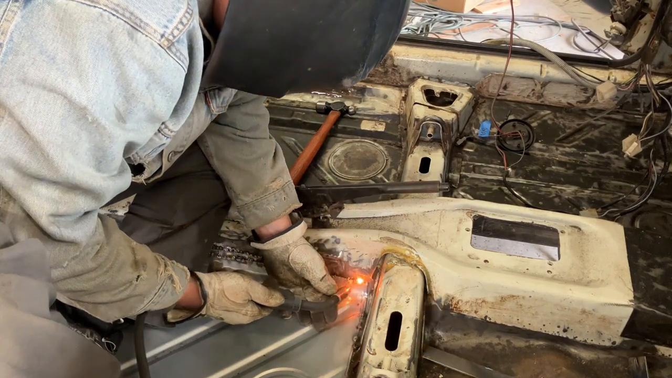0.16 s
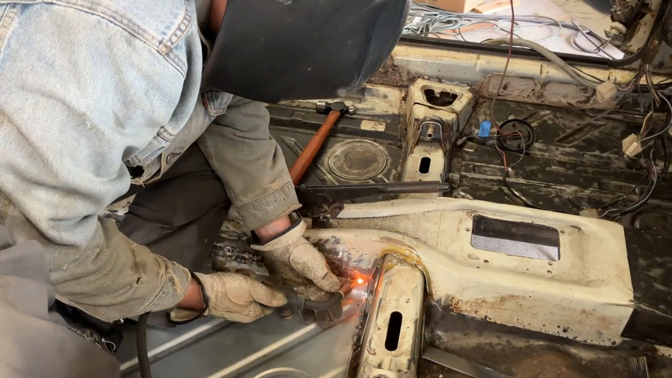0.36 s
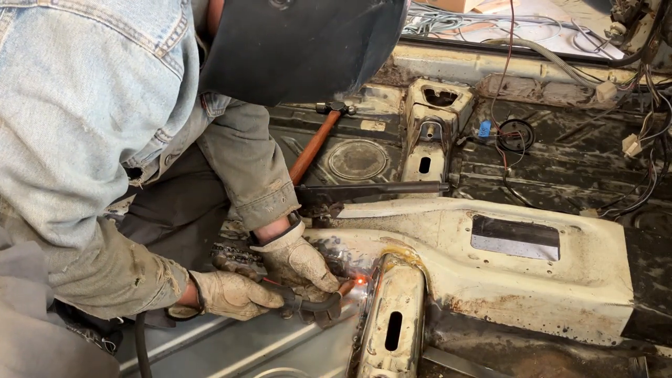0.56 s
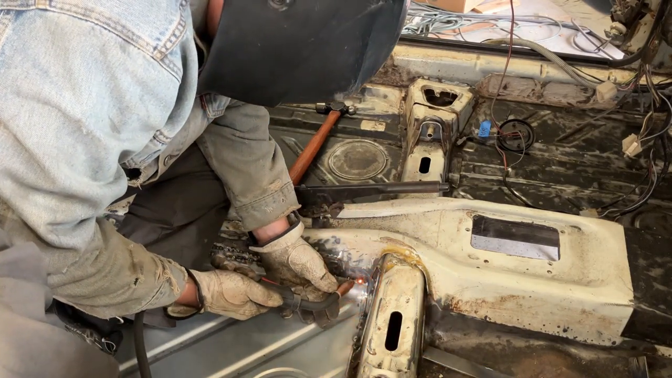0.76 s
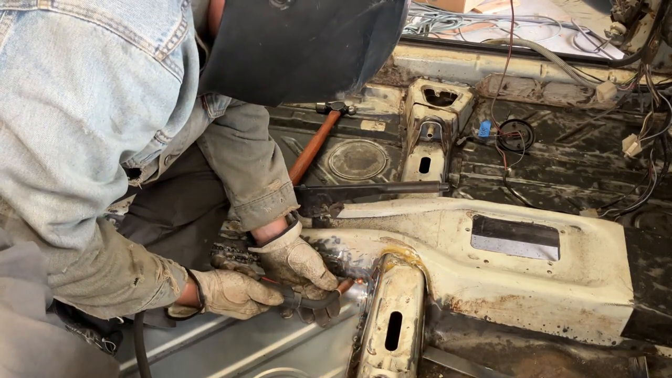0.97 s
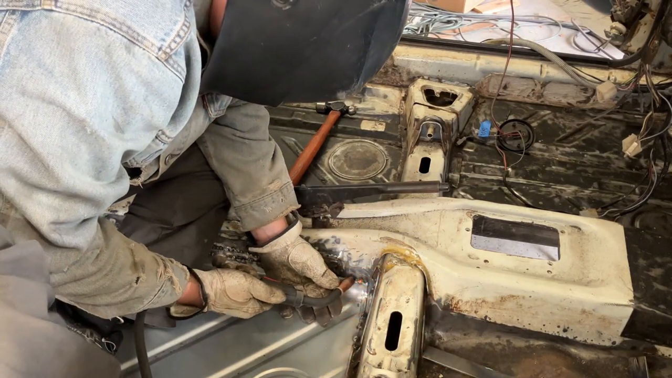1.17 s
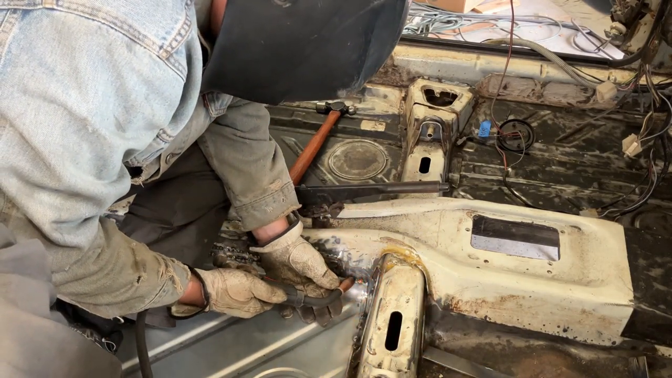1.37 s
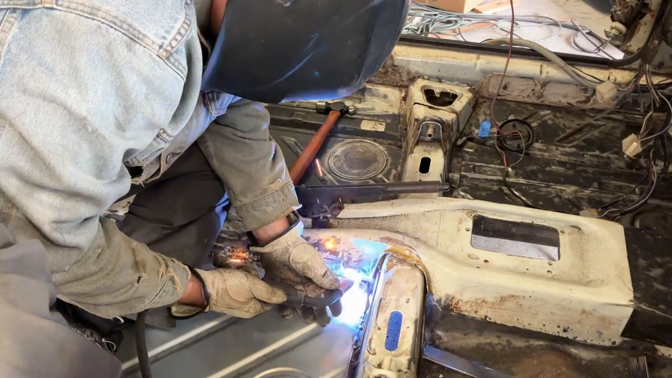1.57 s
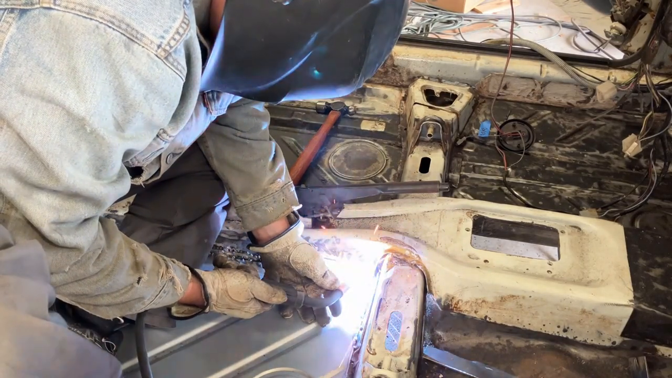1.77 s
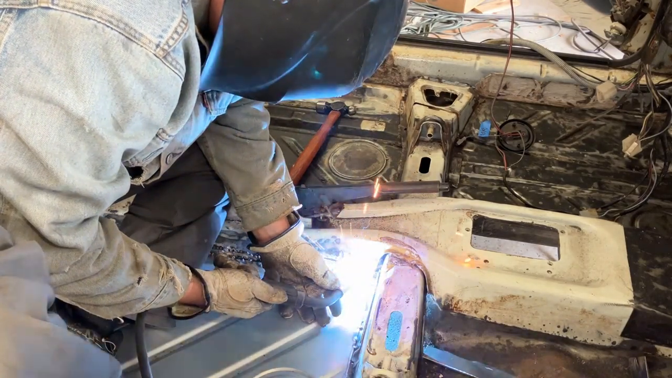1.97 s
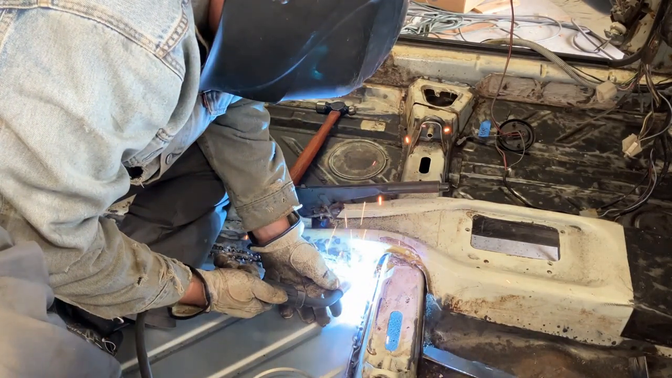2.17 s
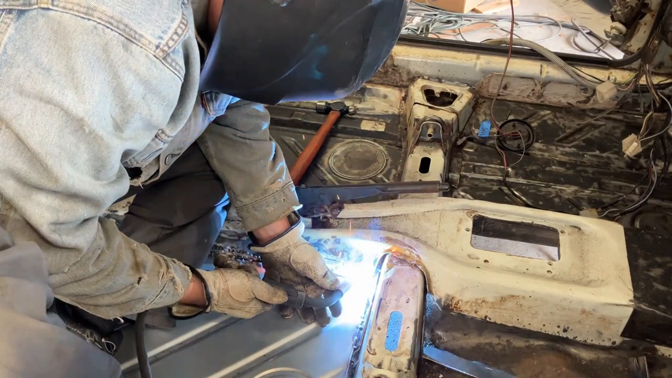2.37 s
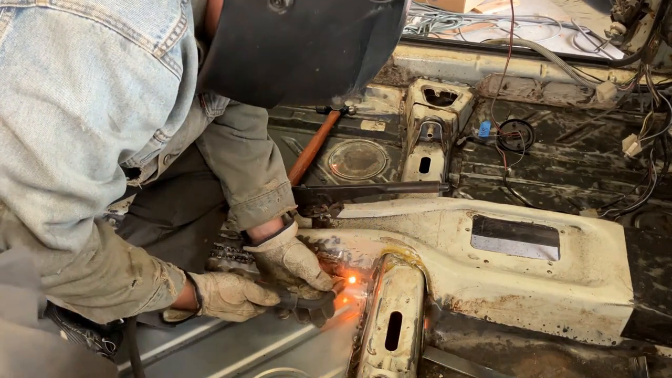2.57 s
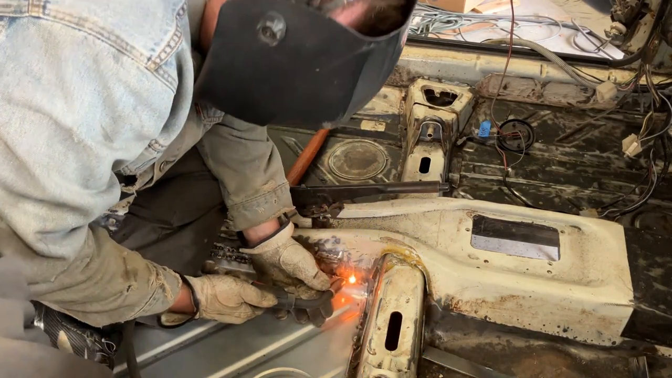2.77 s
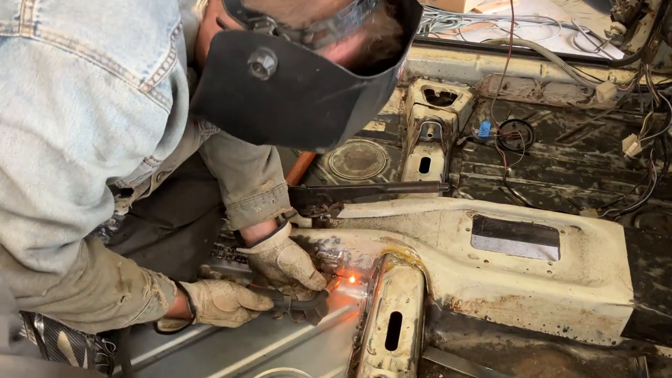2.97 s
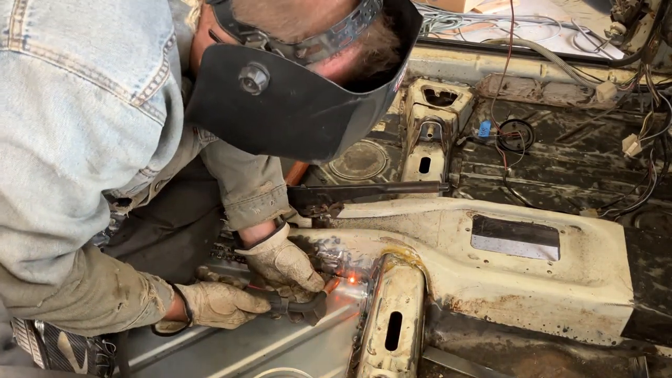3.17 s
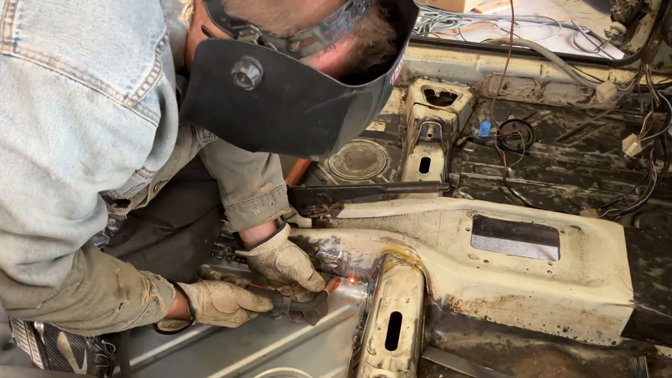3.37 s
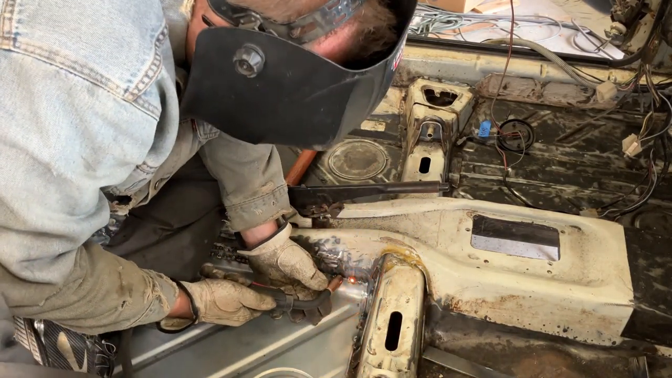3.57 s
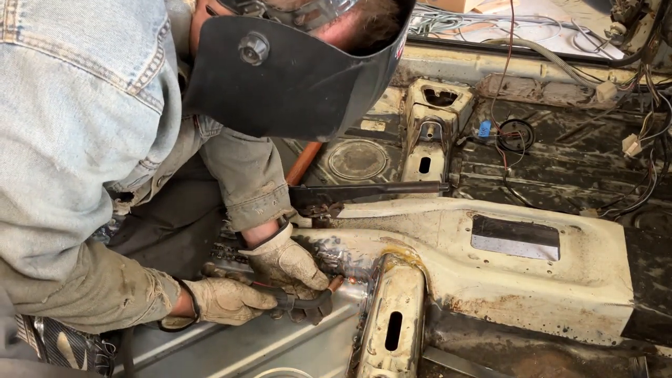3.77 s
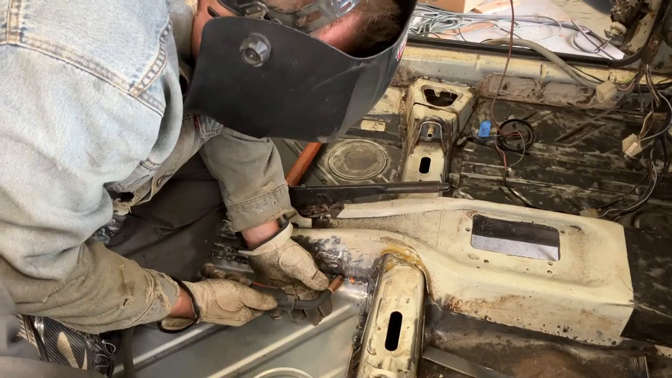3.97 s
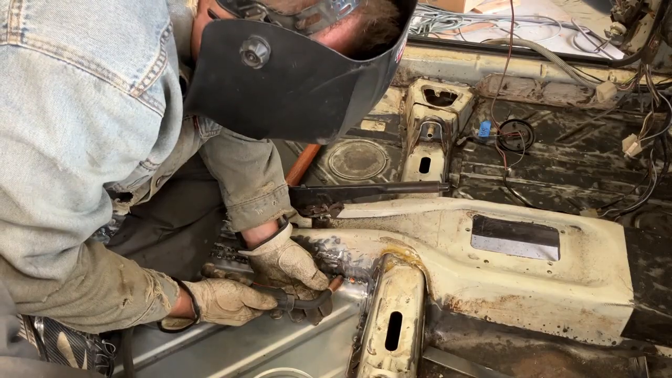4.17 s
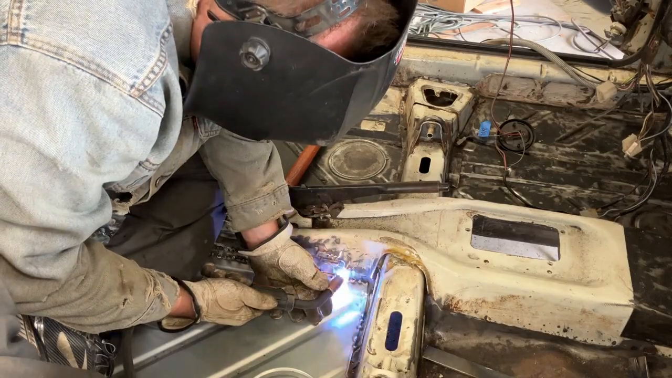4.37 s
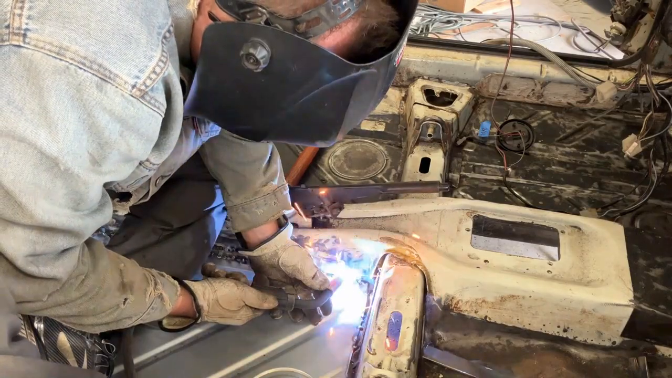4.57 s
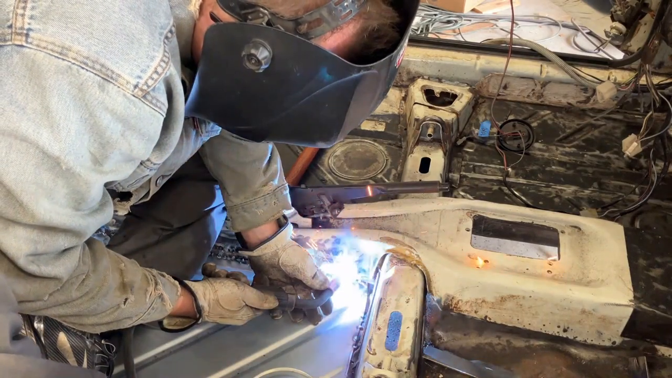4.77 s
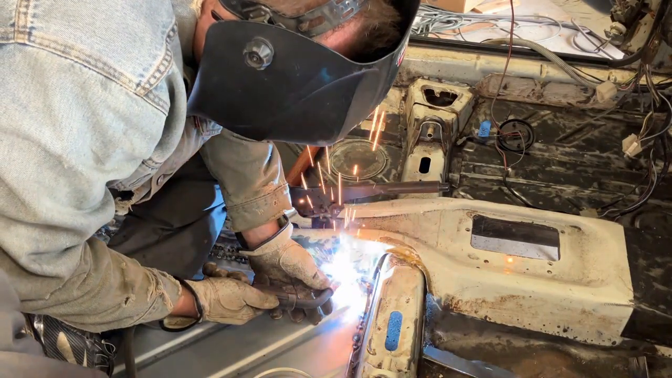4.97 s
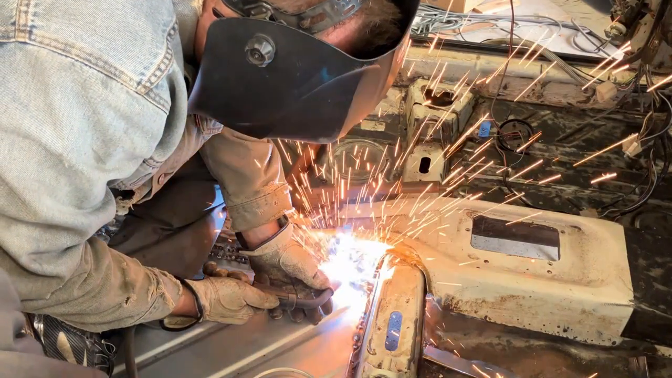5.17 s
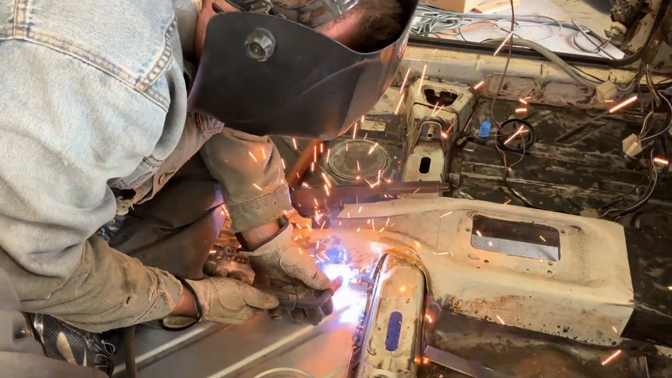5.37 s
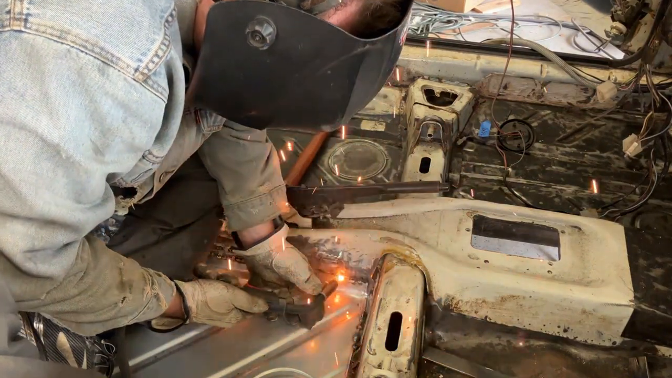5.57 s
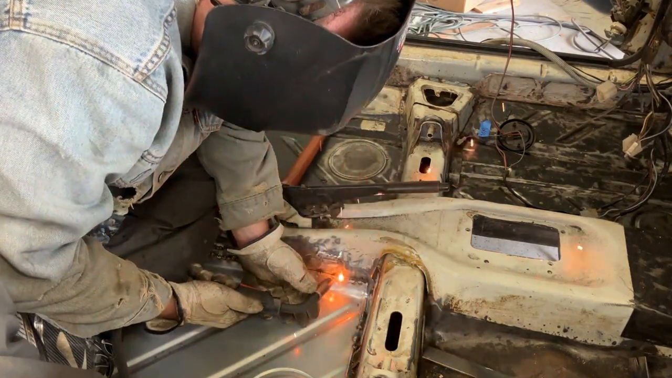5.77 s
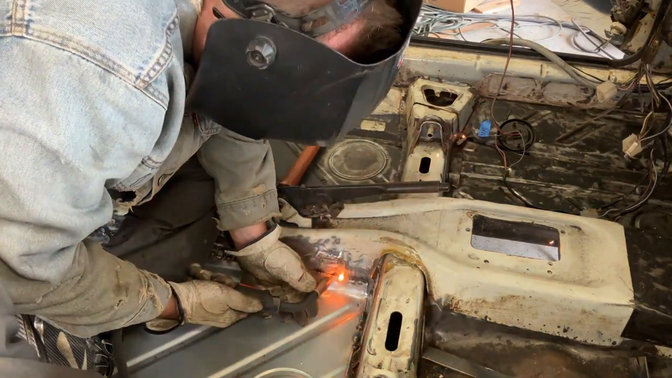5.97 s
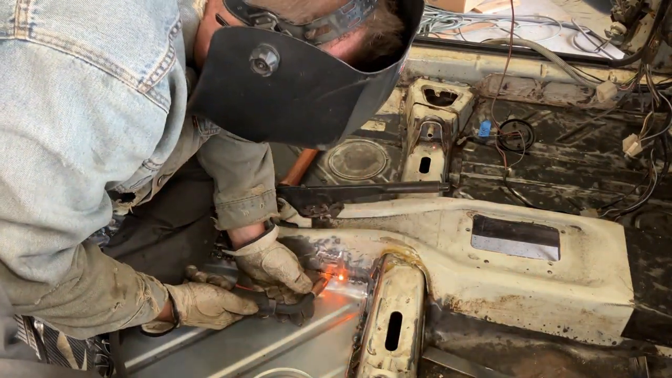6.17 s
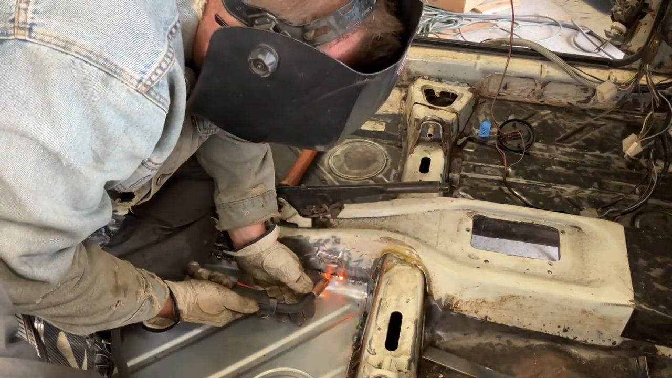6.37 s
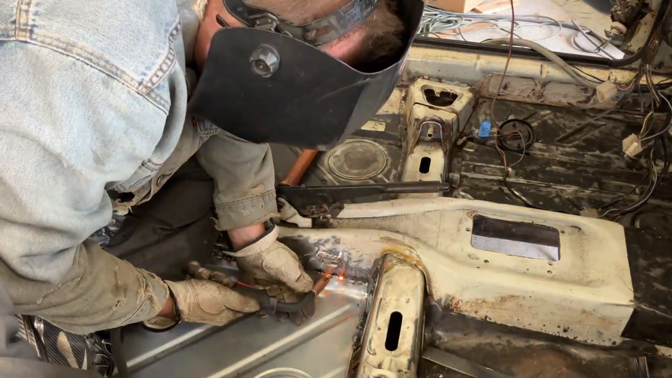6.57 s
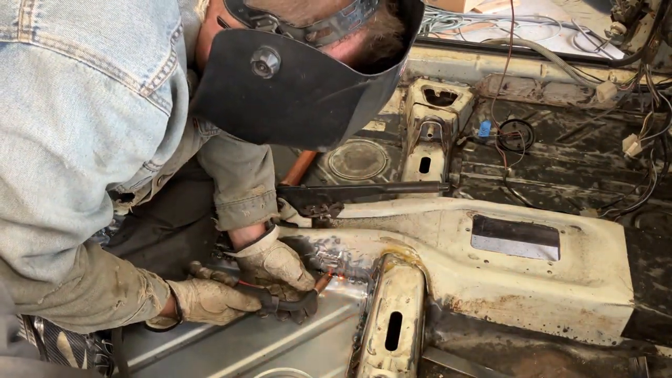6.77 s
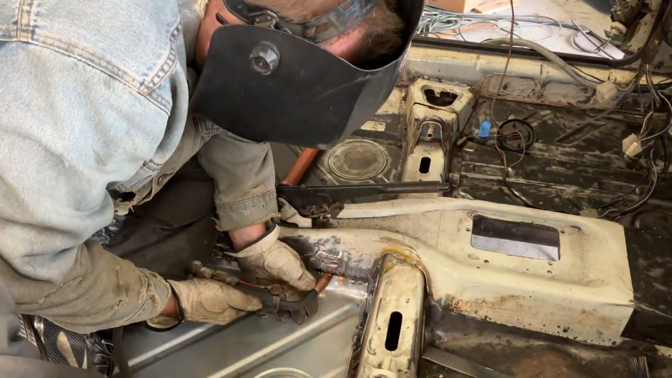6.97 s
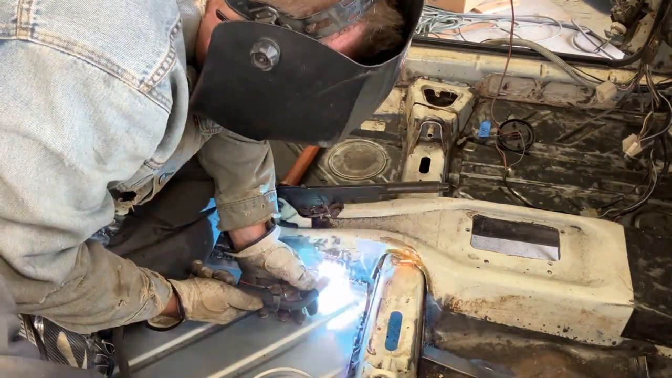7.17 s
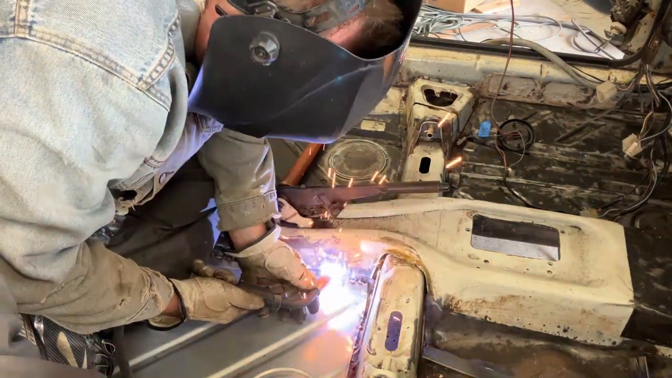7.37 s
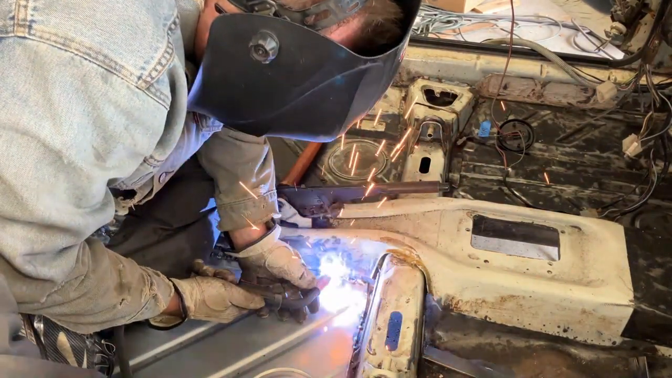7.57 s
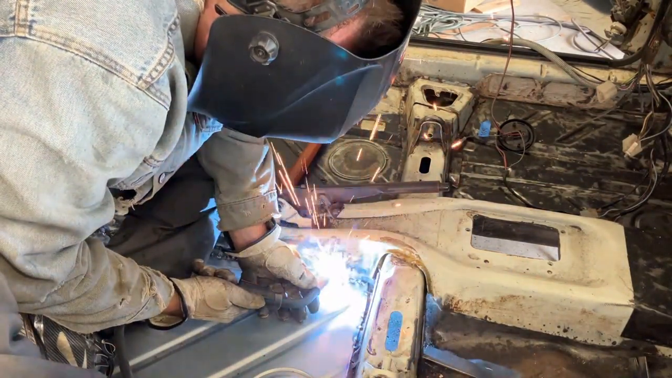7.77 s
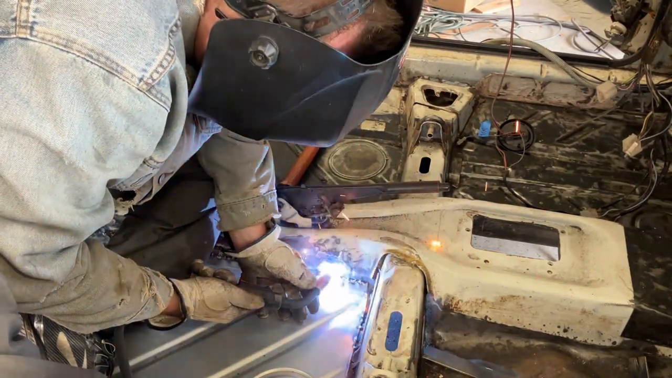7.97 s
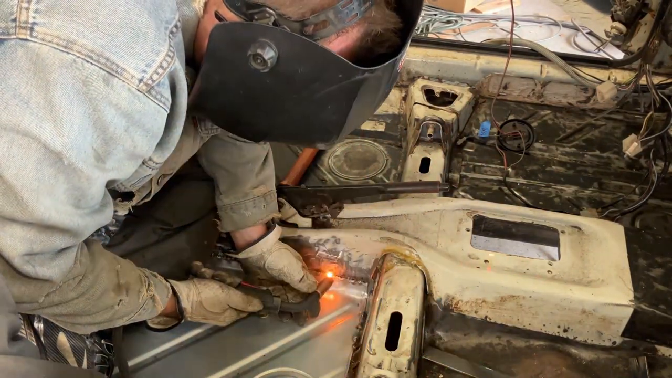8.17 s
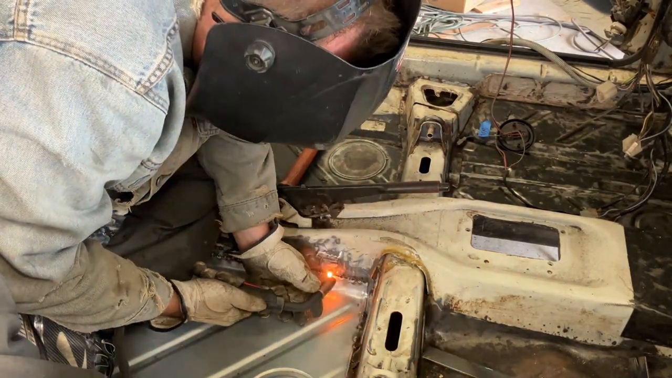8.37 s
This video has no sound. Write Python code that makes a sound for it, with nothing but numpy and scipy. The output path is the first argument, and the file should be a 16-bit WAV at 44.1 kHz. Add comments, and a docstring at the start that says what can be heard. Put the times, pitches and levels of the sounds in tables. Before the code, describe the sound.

Quiet room rumble and fading fizz open, then a welding arc crackles in a stuttering burst. After a pause of tiny metal ticks a second, longer burst spits and snaps, with soft low thumps of air near its end. Another lull follows, then a third, shorter, forceful burst. Close wide stereo, metallic reflections, short garage reverberation.

```python
"""A garage, where a wire-feed welder lays three short tacks on sheet steel. Gas hisses first, then the wire
shorts and the arc re-strikes in sharp pops: noise bursts that ring the resonances of the steel pan. Shaped
noise makes arc sizzle, gas and wire-feed whirr; soft pulses push air, bright clicks tick as steel cools.
Rumble, buffeting and fizz are slowly varied noise, and two faint whines are wavering sines. The recorder delays
the bass and turns phase between its two sides."""
import sys
import numpy as np
from scipy import signal
from scipy.fft import rfft, irfft, next_fast_len
from scipy.io import wavfile
from scipy.ndimage import uniform_filter1d, map_coordinates

SR = 44100
rng = np.random.default_rng(int(sys.argv[2]) if len(sys.argv) > 2 else 0)


def log_audio(samples):
    """Write samples as a 16-bit WAV file to the path given in sys.argv[1]."""
    # one column per channel
    frames = np.atleast_2d(samples).T
    # limit to full scale, then quantise
    limited = np.clip(frames, -1, 1)
    pcm = np.round(limited * 32767).astype(np.int16)
    wavfile.write(sys.argv[1], SR, pcm)


N = 371763

# Three tacks, each elsewhere on the pan: (trigger on [s], trigger off [s], low modes [dB], middle modes [dB],
# high modes [dB], gas [dB], wire-feed whirr [dB])
TACKS = [(1.407, 2.465, 3, 3, 1, -43, -53), (4.131, 5.376, 4.5, 2.5, 2.5, -44, -52.5),
         (7.093, 7.965, 1.5, -4.5, 1.5, -44, -53)]
# Runs of arc re-strikes between stumbles of the wire: (first pop [s], last pop [s], count,
# first pop level [dB], last pop level [dB], arc sizzle [dB], hurry [ratio, gaps shorten above 0])
ARC_RUNS = [(1.5088, 1.5087, 1, -16, -15.5, -41, 0), (1.6003, 1.6005, 1, -15, -16, -28.5, 0),
            (1.6201, 1.7046, 7, -15, -13.5, -33, .04), (1.7399, 1.7768, 3, -14.5, -13, -33, -.2),
            (1.811, 1.8395, 3, -14, -19, -36, .1), (1.8581, 1.9083, 4, -17.5, -15, -37.5, .15),
            (1.9382, 1.9912, 4, -18, -14, -36, .25), (2.0093, 2.1069, 7, -18.5, -16, -40, .04),
            (2.1405, 2.235, 7, -16, -17, -44, -.1), (2.2699, 2.3368, 5, -16.5, -15, -37.5, -.15),
            (2.3503, 2.4064, 4, -19.5, -17.5, -40, .15), (2.4275, 2.4445, 2, -15.5, -15.5, -41.5, 0),
            (4.2874, 4.2875, 1, -16, -16.5, -44.5, 0), (4.381, 4.381, 1, -29, -29, -42, 0),
            (4.395, 4.4379, 4, -14, -17, -29, -.05), (4.4891, 4.5482, 5, -19, -16.5, -34.5, .16),
            (4.5976, 4.687, 6, -16, -16, -35, .3), (4.6963, 4.7156, 3, -16, -17, -29, -.3),
            (4.7352, 4.7795, 5, -17, -19.5, -32, .1), (4.7989, 4.8613, 5, -16, -15.5, -32, .26),
            (4.8815, 4.9234, 4, -16.5, -15.5, -32, .35), (4.9442, 5.0164, 5, -15.5, -15, -31.5, .3),
            (5.0462, 5.0788, 3, -17, -23, -37, .2), (5.0971, 5.1261, 3, -15, -13, -35, .15),
            (5.1501, 5.1861, 3, -16, -15, -31.5, .3), (5.2753, 5.3278, 5, -16.5, -21.5, -41, .25),
            (5.36, 5.36, 1, -29, -29, -46, 0), (7.108, 7.108, 1, -35, -35, -48, 0),
            (7.1317, 7.1319, 1, -14.5, -16, -27, 0), (7.2172, 7.224, 2, -14.5, -17, -45, 0),
            (7.2733, 7.3406, 6, -14, -12.5, -30, .3), (7.3559, 7.3756, 2, -13, -12.5, -34.5, 0),
            (7.4346, 7.474, 3, -19, -12.5, -33, .3), (7.4877, 7.5302, 4, -15.5, -16.5, -27.5, -.03),
            (7.5526, 7.5942, 3, -22, -19, -38.5, 0), (7.6093, 7.6379, 3, -15, -14, -34, -.05),
            (7.676, 7.676, 1, -23, -22.5, -39, 0), (7.6918, 7.724, 3, -17, -15, -35, -.25),
            (7.7324, 7.8076, 5, -16, -18, -38, -.2), (7.8262, 7.8574, 4, -21, -14, -38, .05),
            (7.8722, 7.9225, 5, -20, -16, -35, .4), (7.9466, 7.9467, 1, -17.5, -16.5, -46, 0)]
# Steel pan resonances in three rows: (centre [Hz], width [Hz], level [dB])
LOW_MODES = [(230.8, 67, -2), (488, 123, 6.5), (726, 230, -7.5), (937, 132, 3.5), (1167, 170, 0),
             (1563, 180, 6), (2267, 190, 1), (2957, 270, 3)]
MIDDLE_MODES = [(3230, 500, -3.5), (3780, 67, -12.5), (3896, 500, 6), (4300, 99, -1.5), (4990, 310, 7.5),
                (5636, 280, 8.5), (6060, 190, 4)]
HIGH_MODES = [(6970, 160, 0), (8020, 350, 1.5), (7890, 910, 5), (8660, 510, 8.5), (8870, 270, 2.5),
              (9630, 2700, 4), (12220, 1200, 5.5), (13200, 800, 2), (14600, 900, 3), (15600, 550, -1.5)]
# Reflections from nearby steel faces: (delay [s], level [dB])
STEEL_ECHOES = [(.00018, -3.5), (.0004, -10), (.00095, -8), (.0012, -6), (.0016, -12.5), (.0019, -7.5),
                (.00245, -3.5), (.0063, -11)]
# How fast the garage dies away: (frequency [Hz], t60 [s])
GARAGE_DECAY = [(200, 0.28), (2000, 0.17), (10000, 0.27)]
# Colour of the arc sizzle, and of the gas heard off the pan: (frequency [Hz], relative density [dB per Hz])
GAS_COLOUR = [(150, -10), (500, 0), (1500, -3.5), (3000, -3), (5000, 3), (9000, -7), (13000, -10.5),
              (16000, 5)]
# Colour of gas straight from the nozzle: (frequency [Hz], relative density [dB per Hz])
NOZZLE_COLOUR = [(1500, -25), (3500, -10), (5000, -5), (8000, -2), (11500, 1), (14500, -4.5), (16000, -7)]
# Colour of the wire-feed whirr: (frequency [Hz], relative density [dB per Hz])
WHIRR_COLOUR = [(600, -26.5), (1100, -2.5), (1600, 0.5), (2300, -6), (3200, -29.5)]
# Low puffs as the pool blows through: (time [s], level [dB])
PUFFS = [(1.779, -41.5), (4.907, -19.5), (4.925, -19), (4.943, -12.5), (4.965, -10.5), (5.021, -21.5),
         (5.128, -16), (5.17, -4), (5.306, -19.5)]
# Spatter and cooling ticks: (time [s], level [dB])
TICKS = [(0.2067, -49), (0.4065, -53), (0.503, -43.5), (2.6475, -53), (2.7841, -50.5), (2.9248, -46),
         (2.9806, -46.5), (3.012, -53), (5.64, -50), (5.7734, -49), (5.8167, -53), (5.9703, -50),
         (6.0157, -50), (6.048, -49), (6.1594, -52), (6.195, -49), (6.2805, -46.5), (8.328, -50),
         (8.3838, -45.5)]
# Background swells: (time [s], rumble [dB], buffeting air [dB], fizz of cooling steel [dB])
AIR_LEVELS = [(0, -54, -48.5, -64), (.66, -55, -48, -66.5), (.8, -54.5, -48.5, -73), (1.4, -54, -48, -71.5),
              (2.7, -57.5, -53, -65.5), (4.1, -56, -51.5, -66), (4.85, -49, -47.5, -68.5),
              (5.3, -61, -41.5, -64), (5.45, -56, -60, -64), (6.2, -58.5, -61, -66.5),
              (6.55, -60.5, -63.5, -68), (6.65, -63, -50, -68), (7.1, -58.5, -53, -73),
              (8.1, -56.5, -60, -66.5), (8.43, -59, -52.5, -66.5)]
# Colour of the garage rumble: (frequency [Hz], relative density [dB per Hz])
RUMBLE_COLOUR = [(60, -13.5), (150, -3), (300, -3), (800, -11.5), (1800, -20.5), (3000, -22), (6000, -50)]
# Colour of the buffeting air: (frequency [Hz], relative density [dB per Hz])
BUFFET_COLOUR = [(30, -11.5), (55, 7), (100, -4.5), (250, -12.5), (400, -56.5)]
# Colour of the cooling fizz: (frequency [Hz], relative density [dB per Hz])
FIZZ_COLOUR = [(1000, -14.5), (2500, 0), (5000, -3.5), (9000, -3.5), (13000, -6.5), (16000, -9.5)]
# Faint whines: (frequency [Hz], level [dB])
WHINES = [(1760, -68.5), (2008, -75.5)]
# Phase between the microphones: (frequency [Hz], left ahead of right [rad])
LEFT_LEAD = [(100, 0.5), (460, 0.03), (650, -2), (850, 2), (1150, 0.24), (1500, 0.83), (1800, -2.5),
             (2200, 1.5), (2700, 2), (4600, -0.26), (5600, 1.5), (6300, 1.47), (7000, -0.17)]
# Balance of the microphones: (frequency [Hz], left minus right [dB])
BALANCE = [(300, 0), (550, -2.5), (950, 3.5), (1250, 1), (1550, -2), (2100, -1.5), (2600, 1.5), (4500, 0),
           (5900, -4), (6300, 0)]
# Left-right likeness ahead of phase and balance: (frequency [Hz], likeness [ratio])
LIKENESS = [(60, 1), (300, 0.83), (1000, 0.21), (2500, 0.75), (5000, 0.84), (8500, 0.98)]

JITTER_S, SCATTER_DB = .0003, 1.1  # unevenness inside a run
DOUBLE_SHARE, DOUBLE_S, DOUBLE_DB = .07, .0066, -6.5  # some pops strike again, weakly
# the sizzle rises 60 dB into a run, sags after it, and also dies once the trigger is off
ARC_LEAD_S, ARC_T60_S, ARC_OUT_T60_S = .055, .19, .34
GAS_SWELL_DB, GAS_SWELL_S, GAS_T60_S = -5.5, .055, .1  # dip around trigger on, then bleed after trigger off
# the air is louder just after an arc stops, also after a tack that ended just before the start
EARLIER_OFF_S, SETTLE_T60_S = -.019, .43
RUMBLE_SETTLE_DB, FIZZ_SETTLE_DB = 4, 16.5
TOP_HZ = 16000  # nothing passes above this


def amp(db):
    """Decibels to linear gain."""
    return 10 ** (np.asarray(db) / 20)


def unit(x):
    """Scale to an rms of 1."""
    return x / np.sqrt(np.mean(x ** 2) + 1e-20)


def along(points, hz):
    """Read (frequency, value) points on a log frequency axis."""
    f, v = np.transpose(points)
    return np.interp(np.log(hz + 1), np.log(f + 1), v)


def curves(rows):
    """One value per sample for each column after the time."""
    s, *columns = np.transpose(rows)
    return [np.interp(np.arange(N) / SR, s, column) for column in columns]


def wobble(rate):
    """A smooth random curve with the given number of knots a second."""
    knots = rng.standard_normal(int(N * rate / SR) + 4)
    return map_coordinates(knots, [np.arange(N) * rate / SR])


def fading(off, t60):
    """Gain 1 until off, then dying 60 dB per t60 seconds."""
    return amp(-60 * np.maximum(np.arange(N) / SR - off, 0) / t60)


def filtered(x, response):
    """Multiply the spectrum of x by a complex response of frequency."""
    m = next_fast_len(N + SR // 2)
    return irfft(rfft(x, m) * response(np.fft.rfftfreq(m, 1 / SR)), m)[..., :N]


def noise(colour):
    """Two unrelated coloured noises with a joint rms of 1."""
    white = rng.standard_normal((2, N))
    return unit(filtered(white, lambda hz: amp(along(colour, hz))))


def bursts(times, db, snap, flash, after_db, after):
    """A sharp front at each time, then noise in two decays, a flash and a weaker afterglow (t60 s)."""
    t = np.arange(600) / SR
    decay = amp(-60 * t / flash) + amp(after_db - 60 * t / after)
    shape = rng.standard_normal((len(times), 2, len(t))) * decay
    shape[:, :, 0] = snap
    starts = np.round(np.asarray(times) * SR).astype(int)
    at = (starts[:, None] + np.arange(len(t))).ravel()
    gain = amp(db)[:, None]
    return np.array([np.bincount(at, (gain * shape[:, row]).ravel(), N + SR)[:N] for row in range(2)])


def pops():
    """Each re-strike is one snap of hot gas with a brief spit after it."""
    s, db = [], []
    for first, last, count, first_db, last_db, _, hurry in ARC_RUNS:
        even = np.linspace(0, 1, round(count))
        chance = rng.standard_normal((len(even), 2))
        inner = even % 1 > 0  # the end pops keep their exact time
        at = first + (last - first) * (even + hurry * even * (1 - even))
        at = at + JITTER_S * chance[:, 0] * inner
        level = first_db + (last_db - first_db) * even + SCATTER_DB * chance[:, 1]
        twice = rng.random(len(even)) < DOUBLE_SHARE
        s = np.r_[s, at, at[twice] + DOUBLE_S]
        db = np.r_[db, level, level[twice] + DOUBLE_DB]
    return bursts(s, db, snap=5.72, flash=.0015, after_db=-10.0, after=.034)


def sizzle():
    """The burning arc hisses unevenly, with small sputters on top."""
    t = np.arange(N) / SR
    runs = [amp(db - 60 * np.maximum(first - t, 0) / ARC_LEAD_S) * fading(last, ARC_T60_S)
            for first, last, *_, db, _ in ARC_RUNS]
    trigger = [(t >= on) * fading(off, ARC_OUT_T60_S) for on, off, *_ in TACKS]
    arc = np.max(runs, axis=0) * np.max(trigger, axis=0)
    at = rng.uniform(0, N / SR, 700)
    level = rng.exponential(3.1, len(at))  # dB
    sputter = unit(bursts(at, level, snap=2.5, flash=.0053, after_db=-21.5, after=.012))
    flicker = amp(2.2 * wobble(60))
    return arc * (flicker * noise(GAS_COLOUR) + .38 * sputter)


def pan_answer(weights, echo, f):
    """The pan rings from the instant of the blow: minimum phase resonances, then steel reflections."""
    rows = zip((LOW_MODES, MIDDLE_MODES, HIGH_MODES), weights)
    power = sum(amp(2 * (db + row_db)) / (1 + (2 * (f - centre) / width) ** 2)
                for modes, row_db in rows for centre, width, db in modes)
    # the resonances set most of the colour, the echoes mainly spread it in time
    power = power / (np.abs(echo[0]) ** 2 + .1527)
    cepstrum = irfft(np.log(power) / 2)
    # fold onto positive times, so nothing sounds before the blow
    cepstrum[1:len(f) - 1] *= 2
    cepstrum[len(f):] = 0
    return irfft(np.exp(rfft(cepstrum)) * echo)[:, :len(f)]


def pan(x):
    """The steel keeps its modes; each welded spot weights their three rows differently."""
    t, f = np.arange(N) / SR, np.fft.rfftfreq(4096, 1 / SR)
    # a later echo is duller
    paths = np.array([amp(db) * np.exp(-2j * np.pi * f * s) / (1 + 1j * f * s / 25)
                      for s, db in STEEL_ECHOES])
    turns = (-1) ** np.arange(len(paths))[:, None]  # echoes come from either side in turn
    echo = np.array([1 + paths.sum(0), .97 * (turns * paths).sum(0)])
    out = np.zeros_like(x)
    for on, off, *weights in TACKS:
        near_tack = (t >= on - .5) & (t < off + .5)
        answer = pan_answer(weights, echo, f)
        out += signal.oaconvolve(x * near_tack, answer, axes=1)[:, :N]
    return out


def room(x):
    """The garage answers with a noise tail in which each frequency dies at its own speed."""
    hz, t, z = signal.stft(rng.standard_normal((2, SR // 2)), SR, nperseg=256)
    decay = amp(-60 * t / along(GARAGE_DECAY, hz)[:, None])
    tail = signal.istft(z * decay, SR, nperseg=256)[1]
    tail = tail / np.linalg.norm(tail[0])
    late = np.pad(x, (200, 0))[None]  # starts 200 samples late
    return signal.fftconvolve(late, tail, axes=1)[:, :N]


def gas():
    """Shielding gas blows from the nozzle, heard directly and off the pan."""
    t = np.arange(N) / SR
    flow = 0
    for on, off, *_, db, _ in TACKS:
        opening = np.clip((t - on) / .012, 0, 1)
        swell = amp(db + GAS_SWELL_DB * np.exp(-np.abs(t - on) / GAS_SWELL_S))
        flow = flow + opening * swell * fading(off, GAS_T60_S)
    flow = flow * amp(1.0 * wobble(50))
    direct = flow * noise(NOZZLE_COLOUR)
    return direct + amp(-9) * pan(flow * noise(GAS_COLOUR))


def feeder():
    """The wire drags through its liner while the trigger is held, a whirr of band-shaped noise."""
    t = np.arange(N) / SR
    held = sum(amp(tack[-1]) * ((t >= tack[0]) & (t < tack[1])) for tack in TACKS)
    level = np.abs(uniform_filter1d(held, size=900))  # soft edges, about 20 ms
    return level * amp(1.1 * wobble(50)) * noise(WHIRR_COLOUR)


def puffs():
    """Soft pushes of air as the pool blows through, single rounded pulses with no ring."""
    s, db = np.transpose(PUFFS)
    u = np.arange(SR // 20) / SR / .0023  # time over the rise time
    pulse = u ** 2 * np.exp(2 - 2 * u)
    push = np.bincount(np.round(s * SR).astype(int), amp(db), N)
    push = signal.oaconvolve(push, pulse)[:N]
    return np.array([push, .15 * push])


def ticks():
    """Beads of spatter and shrinking steel click, tiny noise bursts kept bright by a low cut."""
    s, db = np.transpose(TICKS)
    clicks = bursts(s, db, snap=1.1, flash=.0087, after_db=-1.0, after=.029)
    return filtered(clicks, lambda hz: (1j * hz / 4000) ** 2 / (1 + 1j * hz / 4000) ** 2)


def whines():
    """Two thin tones, unsteady in level and phase."""
    t = np.arange(N) / SR
    tone = sum(amp(db + 1.8 * wobble(6)) * np.sin(2 * np.pi * hz * t + 1.4 * wobble(40))
               for hz, db in WHINES)
    return tone * np.array([[1], [.7]])


def air():
    """Rumble, lumpy buffeting and the fizz of cooling steel; rumble and fizz surge as an arc stops."""
    rumble_db, buffet_db, fizz_db = curves(AIR_LEVELS)
    t = np.arange(N) / SR
    stops = [EARLIER_OFF_S] + [tack[1] for tack in TACKS]
    settle = sum((t >= off) * fading(off, SETTLE_T60_S) for off in stops)
    rumble = amp(rumble_db + 1.1 * wobble(20)) * noise(RUMBLE_COLOUR)
    rumble = rumble * (1 + amp(RUMBLE_SETTLE_DB) * settle)
    buffet = amp(buffet_db + 2.5 * wobble(19)) * noise(BUFFET_COLOUR)
    fizz = amp(fizz_db + .62 * wobble(9.4) + 1.093 * wobble(140)) * noise(FIZZ_COLOUR)
    fizz = fizz * (1 + amp(FIZZ_SETTLE_DB) * settle)
    return rumble + buffet + fizz


def scene():
    """Row 0 is what both microphones share, row 1 what differs between them."""
    arc = pan(pops())
    welding = arc + amp(-7) * room(arc[0]) + pan(sizzle())
    return welding + gas() + feeder() + puffs() + ticks() + whines() + air()


def record(dry):
    """The recorder mixes shared and differing sound, turns phase between sides, delays bass and cuts the top."""
    side = np.array([[.5], [-.5]])  # left, right

    def spread(hz):
        turn = np.arccos(np.clip(along(LIKENESS, hz), -1, 1)) / 2
        return np.array([np.cos(turn), np.sin(turn)])

    def ports(hz):
        # above 7 kHz the left lead slips back by .000222 s
        lead = along(LEFT_LEAD, hz) - 2 * np.pi * .000222 * np.maximum(hz - 7000, 0)
        bass_turn = 2 * np.pi * .73 * np.log((hz + 30) / 16000)  # a delay of .73 / (hz + 30) s
        top_turn = 14 * (hz / 16000) ** 2  # the capsule smears the top too
        late = np.exp(-1j * (bass_turn + top_turn))
        low_cut = (1j * hz / 28) ** 5 / (1 + 1j * hz / 28) ** 5
        return amp(side * along(BALANCE, hz)) * np.exp(1j * side * lead) * late * low_cut

    shared, differing = filtered(dry, spread)
    pair = filtered(np.array([shared + differing, shared - differing]), ports)
    pair = pair / (1 + np.abs(pair / .8) ** 4) ** (1 / 4)  # the input rounds off the tallest peaks
    return filtered(pair, lambda hz: np.clip((TOP_HZ - hz) / 250, 0, 1) ** 2)


dry = scene()
out = record(dry)
log_audio(out)
```